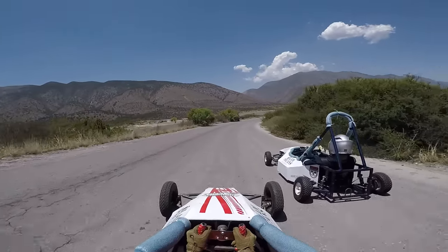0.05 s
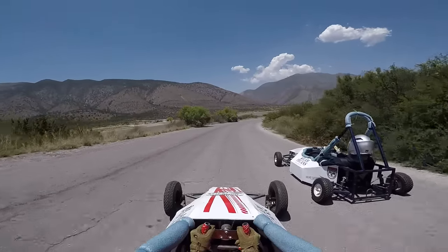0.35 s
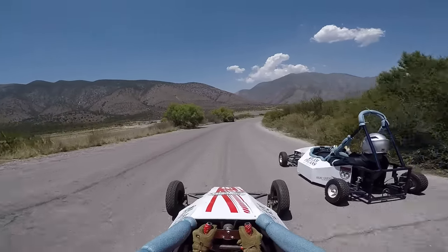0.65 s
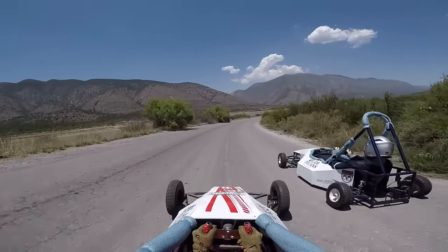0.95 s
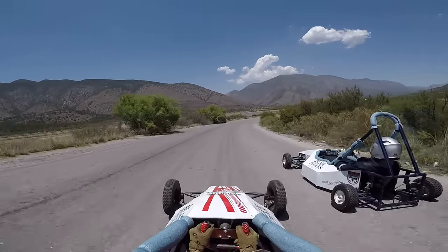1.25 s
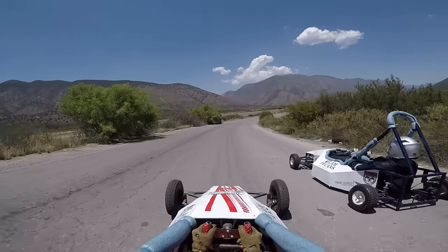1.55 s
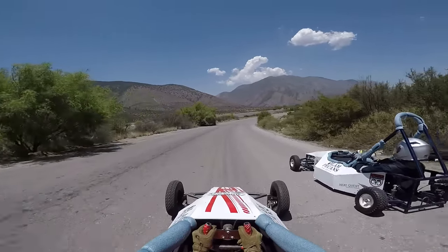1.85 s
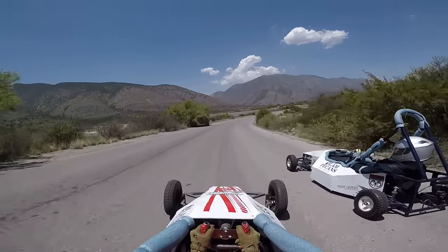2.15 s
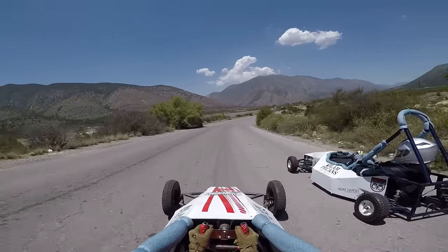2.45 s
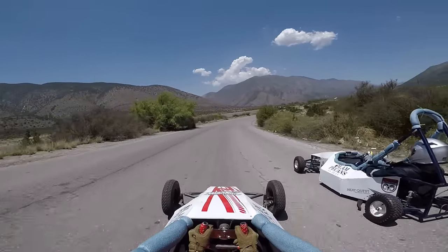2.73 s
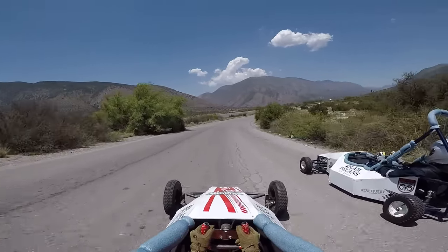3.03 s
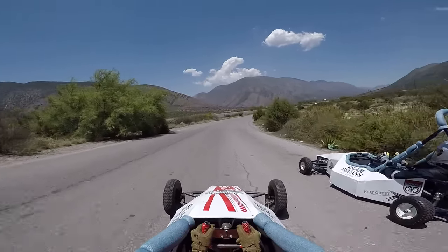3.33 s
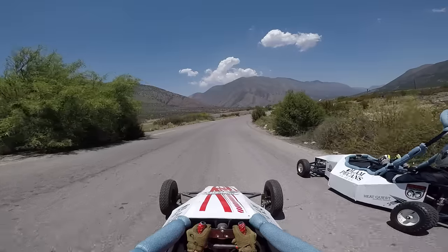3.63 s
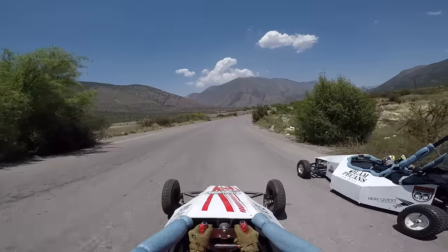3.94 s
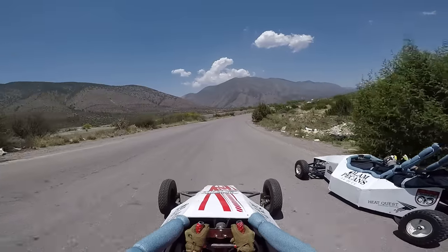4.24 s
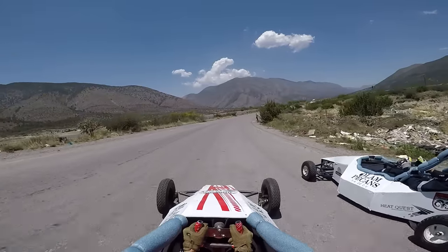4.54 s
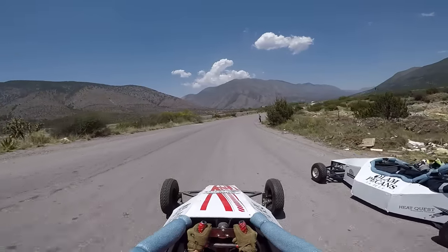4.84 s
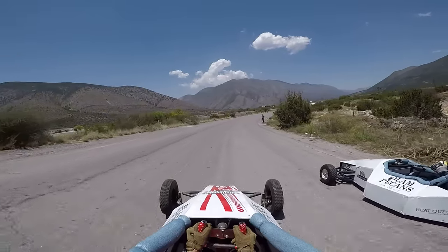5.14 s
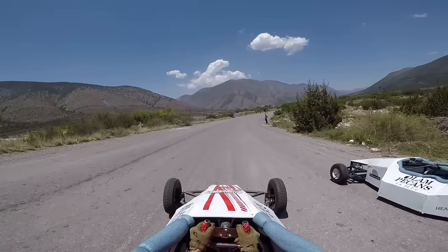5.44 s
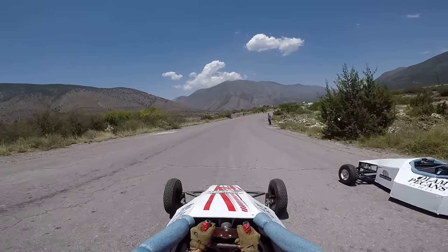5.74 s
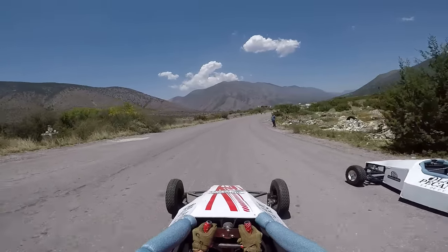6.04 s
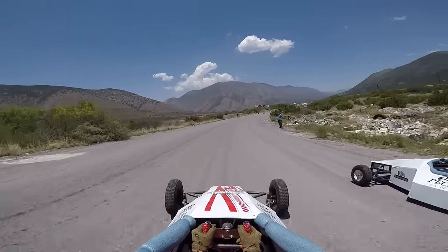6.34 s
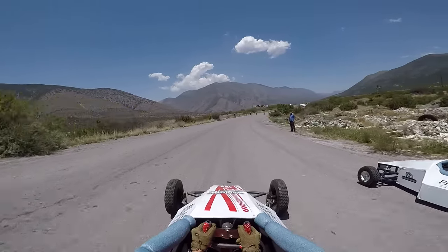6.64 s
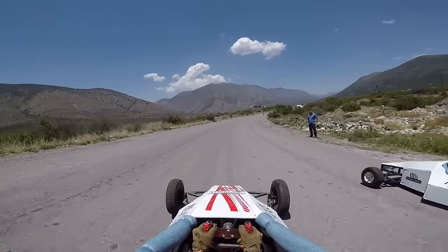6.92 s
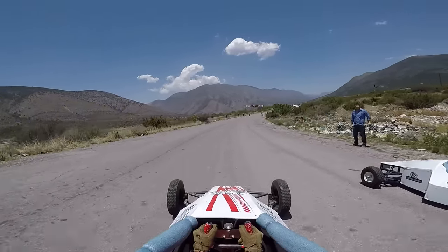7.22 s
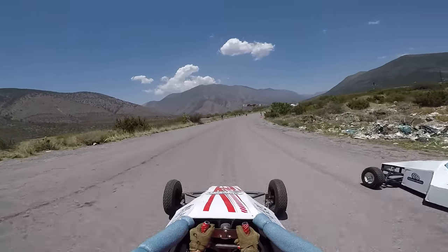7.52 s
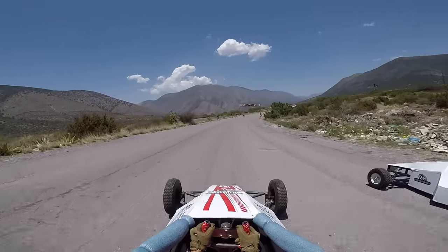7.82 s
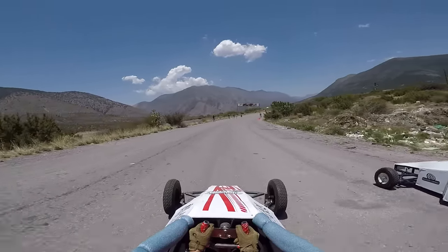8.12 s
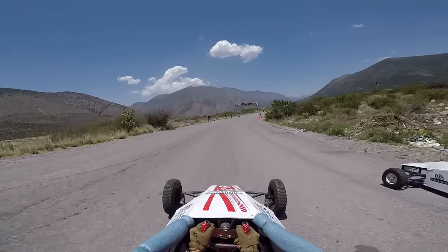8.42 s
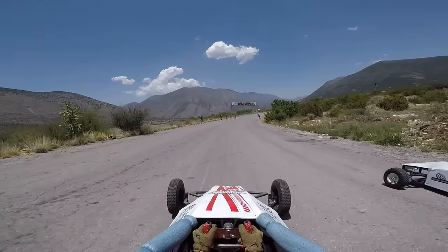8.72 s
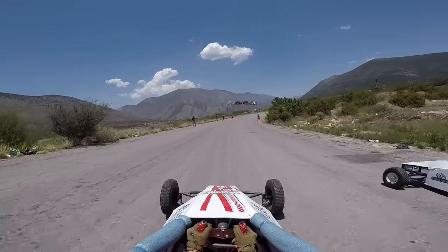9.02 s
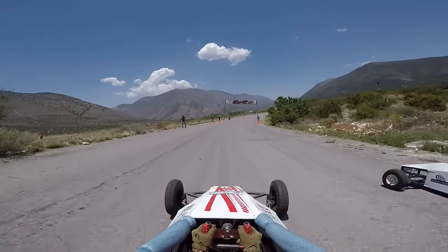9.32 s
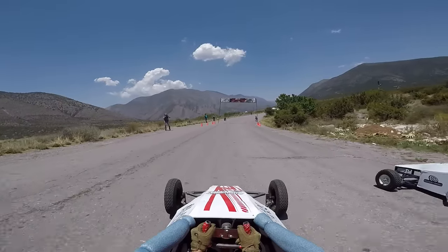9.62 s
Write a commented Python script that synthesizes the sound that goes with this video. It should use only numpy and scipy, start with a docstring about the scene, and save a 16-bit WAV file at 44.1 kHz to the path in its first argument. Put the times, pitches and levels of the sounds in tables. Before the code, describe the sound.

Heavy wind buffeting and rolling tyre noise from a coasting, engineless cart, with loose bodywork rattling, knocking and jingling.

```python
"""Wind booms and drones on a cased camera, riding the roll bar of an unpowered racing car as it coasts
down rough asphalt. Under the buffeting the frame shudders and the tyres roar and hiss. The road rattles
a loose panel, knocks the chassis and body and jingles metal fittings; stone chips tick on the case, with
a few faint squeaks. A fast limiter holds down the buffeting."""
import sys
import numpy as np
from scipy import signal
from scipy.fft import rfft, irfft, next_fast_len
from scipy.io import wavfile
from scipy.ndimage import uniform_filter1d, minimum_filter1d, map_coordinates

SR = 44100
rng = np.random.default_rng(int(sys.argv[2]) if len(sys.argv) > 2 else 0)


def to_wav(s):
    """Save 16-bit WAV."""
    ch = np.atleast_2d(s).T  # columns
    pcm = np.round(np.clip(ch, -1, 1) * 32767)  # PCM
    wavfile.write(sys.argv[1], SR, pcm.astype(np.int16))


N = 430857
TIME = np.arange(N) / SR
WHEEL_HZ = 11.0

# the ring of the loose panel, main mode first: f/Hz, width/Hz, level/dB
PANEL_MODES = [(1500, 107, 3.5), (1102, 260, -8), (1380, 190, -3), (1714, 360, -17), (3600, 1500, -28.5)]


def undb(db):
    """Decibels to gain."""
    return 10 ** (np.asarray(db) / 20)


def unit(x):
    """Scale to rms 1."""
    return x / np.sqrt(np.mean(x ** 2))


def lowpass(x, hz, order):
    """Roll off the top."""
    return signal.sosfilt(signal.butter(order, hz, fs=SR, output="sos"), x)


def curves(table):
    """One automation curve for each column after t/s."""
    times, *columns = np.transpose(table)
    return [np.interp(TIME, times, column) for column in columns]


def swells(table):
    """A level ride in dB from smooth swells and dips: middle t/s, length/s, rise/dB."""
    return sum(db * np.cos(np.pi * np.clip((TIME - s) / length, -.5, .5)) ** 2 for s, length, db in table)


def walk(rate):
    """A random drift of rms 1 that turns about rate times a second."""
    points = rng.standard_normal(4096)
    return unit(map_coordinates(points, [TIME * rate], order=1, mode="wrap"))


def colour(x, points):
    """EQ a sound through (f/Hz, level/dB) points, rolling off past both ends; returned at rms 1."""
    hz, db = np.transpose(points)
    size = next_fast_len(N)
    log_hz = np.log(np.maximum(np.fft.rfftfreq(size, 1 / SR), 1))
    outside = np.abs(log_hz - np.clip(log_hz, np.log(hz[0]), np.log(hz[-1])))
    gain = undb(np.interp(log_hz, np.log(hz), db) - 20 * outside)
    return unit(irfft(rfft(x, size) * gain, size)[:N])


def ring(x, modes):
    """Drive damped modes; two passes through each keep the valleys between them dark."""
    out = 0
    for hz, width, db in modes:
        b, a = signal.iirpeak(hz, hz / width, fs=SR)
        out = out + undb(db) * signal.lfilter(b, a, signal.lfilter(b, a, x))
    return out


def blows(table, modes, chatter_db, chatter_s):
    """Each blow is a firm contact with a short chatter after it; a pitch in its row retunes all modes."""
    out, t = np.zeros(N + SR), np.arange(SR // 8) / SR
    for s, db, *pitch in table:
        shift = pitch[0] / modes[0][0] if pitch else 1
        chatter = rng.standard_normal(len(t)) * np.exp(-t / chatter_s)
        force = (t == 0) + undb(chatter_db) * chatter / np.linalg.norm(chatter)
        sound = ring(force, np.array(modes) * [shift, 1, 1])
        start = int(s * SR)
        out[start:start + len(t)] += undb(db) * sound / np.abs(sound).max()
    return out[:N]


def jolts(rate, spread_db):
    """Random impulses of uneven strength, about rate a second."""
    chance, size = rng.random(N), np.minimum(rng.standard_normal(N), 2)
    return (chance < rate / SR) * undb(spread_db * size)


def chips():
    """The tyres fling up stone chips that tick and skitter on the case."""
    # chip strikes: t/s, level/dB
    strikes = [(1.2317, -52), (1.5425, -55), (3.3593, -53), (3.4666, -43), (3.475, -49), (4.3411, -49),
               (6.36, -54), (6.385, -53), (6.4264, -52), (7.5408, -50), (8.1385, -50), (8.3769, -54)]
    # their bright ring on the case: f/Hz, width/Hz, level/dB
    modes = [(7800, 2500, 1), (10200, 3000, 0.5), (13500, 4000, -5)]
    return blows(strikes, modes, chatter_db=9, chatter_s=0.0025) * undb(-2)


def squeaks():
    """Thin, raspy squeaks that slide down."""
    # faint squeaks: t/s, length/s, starting f/Hz, level/dB
    slides = [(0.838, 0.11, 3600, -55), (3.01, 0.05, 3050, -52), (5.262, .11, 3526, -54),
              (8.352, 0.095, 3720, -51.5), (8.475, 0.07, 3700, -51.5), (8.97, 0.055, 3740, -52)]
    pitch_fall = 0.078  # share of the starting pitch
    rasp = 1 + .04 * walk(900)
    out = 0
    for s, length, first_hz, db in slides:
        progress = np.clip((TIME - s) / length, 0, 1)
        hz = first_hz * (1 - pitch_fall * progress) * rasp
        out = out + undb(db) * np.sin(np.pi * progress) * np.sin(2 * np.pi * np.cumsum(hz) / SR)
    return out * undb(8.5 + 2.7 * walk(200))


def fittings(road_db):
    """The road keeps the metal fittings jingling, with a harder clack here and there."""
    # the ring of the fittings: f/Hz, width/Hz, level/dB
    modes = [(4134, 170, -0.5), (3840, 190, -2.5), (3220, 1300, -7), (4645, 150, -4.5), (6060, 800, -14.5),
             (8200, 600, -20)]
    # single clacks: t/s, level/dB
    clacks = [(0.342, -36), (0.424, -30), (0.433, -37), (0.591, -32), (1.138, -38), (1.803, -36.5),
              (2.8824, -37), (3.078, -31), (3.087, -33), (3.2076, -34), (3.352, -32.5), (3.361, -35),
              (3.472, -33), (3.846, -36), (4.0255, -33.5), (5.002, -35), (6.09, -30), (6.1307, -27),
              (7.033, -34), (7.4094, -33), (8.0157, -33), (9.0902, -28.5)]
    jingle = unit(ring(jolts(rate=60, spread_db=3), modes)) * undb(road_db - 13)
    return jingle + undb(0.3) * blows(clacks, modes, chatter_db=14, chatter_s=0.01)


def chassis_knocks():
    """Bumps knock the chassis and ring its tubes."""
    # knocks: t/s, level/dB, main ring f/Hz
    knocks = [(0.066, -13.5, 1270), (0.365, -21, 1230), (0.434, -11.5, 1230), (0.816, -15, 1270),
              (2.225, -9.5, 1288), (3.209, -12.5, 1270), (4.192, -16, 1200), (5.308, -18, 1301),
              (5.512, -19, 1220), (5.877, -14, 1250), (6.345, -16, 1290), (7.066, -16, 1270),
              (7.339, -19, 1270), (8.234, -16, 1280), (8.277, -11, 1220), (8.681, -16, 1270),
              (8.757, -16, 1283), (8.86, -16, 1254), (8.873, -14, 1177)]
    # the tubes, main mode first: f/Hz, width/Hz, level/dB
    modes = [(1270, 90, 1.5), (530, 160, -2.5), (824, 170, -3), (1042, 170, -1), (2400, 1300, -32)]
    return undb(-0.3) * blows(knocks, modes, chatter_db=-6, chatter_s=0.005)


def body_thuds():
    """Bigger bumps thud in the hollow body."""
    # bumps: t/s, level/dB, main ring f/Hz
    bumps = [(0.435, -19, 530), (1.825, -14, 549), (2.896, -16, 519), (3.564, -22, 522), (3.941, -12, 538),
             (8.733, -16, 490), (9.083, -18, 517.4)]
    # the hollow body, main mode first: f/Hz, width/Hz, level/dB
    modes = [(560, 180, 6), (710, 220, -6), (980, 330, -10)]
    return blows(bumps, modes, chatter_db=-8, chatter_s=0.005)


def panel_chatter():
    """The road keeps the panel chattering against the frame at several points, each with its own ring."""
    # the bed of chatter: t/s, level/dB
    ride = [(0, -39.5), (0.45, -41.5), (0.9, -46.5), (2.6, -42), (2.9, -40), (3.6, -37.5), (4.4, -38.5),
            (5.1, -38.5), (5.7, -36.5), (6.5, -37), (6.85, -40), (7.3, -36), (7.7, -42.5), (8.8, -39),
            (9.2, -43), (9.72, -44)]
    # contact points: main ring f/Hz, level/dB
    contacts = [(1410, 0.5), (1510, -0.5), (1760, -12.5)]
    level_db, = curves(ride)
    out = 0
    for hz, db in contacts:
        modes = np.array(PANEL_MODES) * [hz / PANEL_MODES[0][0], 1, 1]
        out = out + undb(db) * unit(ring(jolts(rate=45, spread_db=2.0), modes))
    return unit(out) * undb(level_db)


def panel_rattles():
    """The loose panel gives single rattles and ticks and, in spells, ticks once per wheel turn."""
    # single rattles and ticks of the loose panel, loud and faint: t/s, level/dB, main ring f/Hz
    singles = [(0.02, -21, 1500), (0.061, -22, 1810), (0.2653, -23, 1650), (0.342, -22, 1500),
               (0.38, -24, 1620), (0.428, -25, 1560), (0.589, -20, 1466), (0.782, -19, 1455),
               (0.824, -22, 1505), (0.98, -25, 1500), (1.134, -24, 1500), (1.803, -22.5, 1516),
               (2.02, -23, 1500), (2.1151, -25, 1500), (2.388, -22.5, 1466), (2.7584, -18.5, 1380),
               (2.8823, -26, 1402), (2.902, -23, 1436), (3.035, -20, 1463), (3.0864, -15, 1470),
               (3.107, -27, 1550), (3.1254, -16, 1450), (3.193, -17, 1500), (3.207, -13.5, 1474),
               (3.5654, -28, 1410), (3.585, -27, 1480), (4.006, -24, 1470), (4.012, -25, 1800),
               (4.7238, -14.5, 1460), (5.452, -27, 1752), (5.724, -23, 1780), (5.728, -17.5, 1413),
               (5.82, -24, 1793), (5.912, -25, 1750), (6.022, -26, 1480), (6.08, -22, 1424),
               (6.149, -21, 1450), (6.178, -24, 1785), (6.443, -26, 1780), (6.56, -23, 1430),
               (6.695, -25, 1480), (6.74, -24, 1530), (6.972, -23, 1500), (7.032, -20, 1500),
               (7.036, -29, 1830), (7.097, -18, 1500), (7.1, -30, 1840), (7.169, -25, 1830),
               (7.175, -21, 1520), (7.249, -22.5, 1440), (7.379, -21.5, 1440), (7.468, -24, 1450),
               (7.515, -19.5, 1450), (7.782, -20.5, 1440), (8.003, -20, 1480), (8.054, -24, 1480),
               (8.323, -13.5, 1435), (8.589, -23, 1480), (8.7331, -20, 1500), (9.0838, -17.5, 1474),
               (9.09, -28, 1850)]
    # spells of ticking: first t/s, last t/s, first level/dB, last level/dB
    spells = [(3.762, 3.848, -20.5, -21), (4.402, 4.667, -26, -28), (4.937, 5.295, -30, -20),
              (5.571, 5.914, -22.5, -16.5), (6.119, 6.29, -22, -28), (6.358, 6.618, -26, -21),
              (8.227, 8.4, -22, -22.5), (8.85, 9.038, -27, -22), (9.262, 9.722, -21, -17.5)]
    tick_hz, scatter_hz = 1480, 22
    ticks = []
    for first, last, first_db, last_db in spells:
        count = round((last - first) * WHEEL_HZ) + 1
        for s, db in np.linspace((first, first_db), (last, last_db), count):
            ticks.append((s, db, rng.normal(tick_hz, scatter_hz)))
    rattles = undb(-1.0) * blows(singles, PANEL_MODES, chatter_db=-1.0, chatter_s=0.012)
    return rattles + undb(1.5) * blows(ticks, PANEL_MODES, chatter_db=-5, chatter_s=0.008)


def panel_buzz():
    """On one bump the panel's main mode builds up, buzzes roughly and dies away."""
    start_s, rise_s, hz = 3.075, 0.015, 1505
    age = np.maximum(TIME - start_s, 0) / rise_s
    rasp = .8 * walk(260)
    envelope = age * np.exp(1 - age) * undb(-18 + 2.43 * walk(150))
    return envelope * np.sin(2 * np.pi * hz * TIME + rasp)


def hiss(hiss_db):
    """Grit crackles under the treads; higher up, air rushes past, growing as the car gathers speed."""
    # tread hiss EQ: f/Hz, level/dB
    tread_eq = [(900, -9), (1750, 8.5), (2400, 3.5), (3700, 1.5), (4080, 2), (4400, -4), (4700, -3.5),
                (5100, -12), (6500, -19.5), (8000, -40.5)]
    # air rush EQ: f/Hz, level/dB
    air_eq = [(3800, -8.5), (5000, 0), (5700, 0), (6450, 3.5), (6900, -1), (7500, -8.5), (8100, -7.5),
              (9500, -17.5), (11000, -34.5)]
    grit = unit(jolts(rate=400, spread_db=2.0))
    treads = (rng.standard_normal(N) + 0.41 * grit) * undb(walk(90))
    air = (rng.standard_normal(N) + 0.49 * grit) * undb(0.61 * walk(40))
    air_db = hiss_db - 12.5 + 0.4745 * TIME
    return colour(treads, tread_eq) * undb(hiss_db + 3.5) + colour(air, air_eq) * undb(air_db)


def tyres(roar_db, drum_db):
    """Coarse asphalt makes the treads roar and drums the hollow body."""
    # tyre roar EQ: f/Hz, level/dB
    roar_eq = [(300, -1.5), (500, 3.5), (680, 1.5), (780, 0), (1020, 2), (1170, -2), (1380, -0.5),
               (1520, -6), (1610, -9.5), (1800, -14), (2200, -33.5), (4000, -50)]
    # body drumming EQ: f/Hz, level/dB
    drum_eq = [(220, -18.5), (360, -4.5), (435, 0.5), (475, -1.5), (530, 1), (590, -10.5), (750, -26)]
    roar = colour(rng.standard_normal(N) * undb(1.17 * walk(70)), roar_eq)
    drum = colour(rng.standard_normal(N) * undb(walk(40)), drum_eq)
    return roar * undb(roar_db) + drum * undb(drum_db)


def shudder():
    """The wheels shake the frame and camera mount three times a turn: a wavering sub-bass."""
    # the weight of the shudder: t/s, level/dB
    ride = [(0, -21.5), (1.9, -22), (2.85, -14), (3.4, -20), (4.25, -14), (4.9, -21), (5.7, -13.5),
            (6.7, -18.5), (7.15, -13.5), (8.0, -16.5), (8.3, -23.5), (8.6, -14), (8.95, -25), (9.25, -18),
            (9.72, -9.5)]
    level_db, = curves(ride)
    hz = 3 * WHEEL_HZ * (1 + 0.012 * walk(2))
    phase = 2 * np.pi * np.cumsum(hz) / SR
    return np.sin(phase + walk(11)) * undb(level_db + 2.0 + 2.0 * walk(14))


def wind_drone():
    """Air shedding off the case drones at a low pitch that slides about with the flow."""
    # the path of the drone: t/s, f/Hz, level/dB
    path = [(0, 68, -8), (0.4, 61.4, -17), (0.65, 72, -18), (1.0, 60.85, -17), (1.3, 66.2, -22),
            (1.8, 60.95, -14), (2.3, 66.64, -22.5), (2.85, 73.15, -13), (3.25, 68.86, -14.5),
            (3.55, 58.7, -20), (4.1, 68, -18), (4.5, 62.8, -17), (5.0, 73.74, -18), (5.85, 67.3, -15.5),
            (6.25, 76.5, -20.5), (6.6, 63.9, -14), (7.1, 63.4, -21.5), (7.4, 69.2, -10.5),
            (7.95, 62, -19.5), (8.4, 69.14, -16), (8.85, 68, -17.5), (9.25, 62, -20.5), (9.72, 66, -15.5)]
    hz, level_db = curves(path)
    phase = 2 * np.pi * np.cumsum(hz * (1 + 0.01497 * walk(6))) / SR
    return np.sin(phase + .3 * walk(25)) * undb(level_db + 2.3 * np.tanh(walk(12)))


def wind_thumps():
    """Now and then one strong eddy bursts on the case, a soft push with no click."""
    # strong eddies: t/s, level/dB, main boom f/Hz
    eddies = [(0.69, -8, 200), (1.222, -8, 165), (1.383, -9.5, 174), (5.635, -6, 234), (5.942, -3.5, 160),
              (5.972, -5, 190), (7.335, -5.5, 220)]
    # the dull boom of the case, main mode first: f/Hz, width/Hz, level/dB
    modes = [(190, 85, 3), (294, 120, -5.5)]
    booms = blows(eddies, modes, chatter_db=-6, chatter_s=.012)
    return undb(-0.5) * lowpass(booms, hz=700, order=2)


def wind_buffet():
    """Large eddies pound the case; middling ones flutter, small ones come in bursts, and both gust."""
    # large eddy EQ: f/Hz, level/dB
    buffet_eq = [(10, -17), (22, -9), (46, 2), (76, 4), (105, -2.5), (128, -9), (155, -21.5), (260, -26)]
    # middling eddy EQ: f/Hz, level/dB
    flutter_eq = [(70, -20.5), (100, -4.5), (125, 0.5), (150, -9), (200, -23.5)]
    # small eddy EQ: f/Hz, level/dB
    eddy_eq = [(90, -21), (160, 2), (205, 0), (232, -2.5), (275, -1.5), (310, -5.5), (400, -12.5),
               (700, -21), (1500, -43.5)]
    # gusts and lulls: middle t/s, length/s, rise/dB
    gusts = [(0.2, 0.4, 4), (0.7, 0.3, 1.5), (1.23, 0.16, 4), (1.4, 0.26, 2.5), (1.7, 0.15, 3.5),
             (3.38, 0.21, 9), (4.75, 0.23, 0), (5.5, 0.58, 4), (5.98, 0.21, 9), (7.1, 0.7, -1.5),
             (8.1, 0.7, 3.5), (8.62, 0.16, -4), (9.04, 0.2, 4.5), (9.3, 0.25, -1.5), (9.48, 0.1, 5),
             (9.66, 0.21, -2.5)]
    buffet = colour(rng.standard_normal(N), buffet_eq) * undb(-15 + walk(10))
    bursts = undb(4.16 * np.tanh(walk(80)))
    gust_db = swells(gusts) - 0.0944 * TIME  # easing along the ride
    flutter = colour(rng.standard_normal(N), flutter_eq) * undb(-20 + gust_db)
    eddies = colour(rng.standard_normal(N) * bursts, eddy_eq) * undb(-20 + 0.62 * gust_db)
    return buffet + flutter + eddies


def scene():
    """All rides with the camera in open air; the case muffles everything but the chips that strike it."""
    # the asphalt, coarse and smooth by turns: t/s, roar level/dB, hiss level/dB, drumming level/dB
    road = [(0, -29, -39, -25), (0.3, -31, -45.5, -25), (0.5, -31, -46.5, -28.5), (0.7, -32, -48, -31.5),
            (1.3, -30.5, -43.5, -26.5), (1.65, -33.5, -45, -26), (2.3, -33.5, -46.5, -29.5),
            (2.9, -31, -44.5, -24.5), (3.6, -34, -45, -25), (4.2, -30.5, -43, -25),
            (5.0, -31.5, -44.5, -26), (5.9, -30.5, -43.5, -27.5), (6.45, -29, -44.5, -25.5),
            (6.8, -33, -47.5, -26.8), (7.25, -29.5, -43, -24), (8.0, -30.5, -45, -26),
            (8.85, -29.5, -44.5, -25.5), (9.25, -32.5, -47.5, -24.5), (9.72, -29, -42, -23)]
    # short rough or smooth patches: middle t/s, length/s, rise/dB
    patches = [(0.06, .16, -3), (0.38, 0.23, 5.5), (1.3, 0.14, -1.5), (1.375, 0.076, -3.5),
               (1.445, 0.18, 4), (1.59, 0.17, -4.5), (1.71, 0.088, 2.5), (5.83, 0.3, 0), (8.05, 0.25, 4.5)]
    roar_db, hiss_db, drum_db = curves(road)
    # the patches and a throb on each wheel turn move all the rolling noise together
    throb_db = 0.63 * np.sin(2 * np.pi * WHEEL_HZ * TIME + walk(2.4))
    rough_db = swells(patches) + throb_db + 0.77 * walk(20)
    roar_db += 0.67 * rough_db + 1.6
    drum_db += 0.82 * rough_db - 0.7
    hiss_db += rough_db - 1.65
    rolling = tyres(roar_db, drum_db) + hiss(hiss_db) + shudder()
    wind = wind_drone() + wind_buffet() + wind_thumps()
    bodywork = fittings(hiss_db) + chassis_knocks() + body_thuds() + panel_chatter() + panel_rattles()
    dulled_bodywork = lowpass(bodywork, hz=7200, order=4)
    outside = wind + rolling + dulled_bodywork + squeaks() + panel_buzz()
    return (lowpass(outside, hz=10500, order=12) + chips())[None]


def limiter(x, ceiling_db, hold_s):
    """Duck smoothly around each peak that passes the ceiling."""
    size = int(hold_s * SR)
    gain = 1 / np.maximum(np.abs(x) / undb(ceiling_db), 1)
    return x * uniform_filter1d(minimum_filter1d(gain, size), size)


def record(dry):
    """Limit the bass, catch the last peaks and roll off the highest treble."""
    bass_hz, top_hz = 250, 15700
    bass = signal.sosfiltfilt(signal.butter(2, bass_hz, fs=SR, output="sos"), dry)
    held_bass = limiter(bass * undb(0.93), ceiling_db=-4.5, hold_s=0.018)
    held = limiter(held_bass + dry - bass, ceiling_db=-1.1, hold_s=.004)
    fade_in = np.minimum(TIME / .004, 1)
    return signal.sosfilt(signal.ellip(8, .2, 70, top_hz, fs=SR, output="sos"), held * fade_in)


dry = scene()
out = record(dry)
to_wav(out)
```